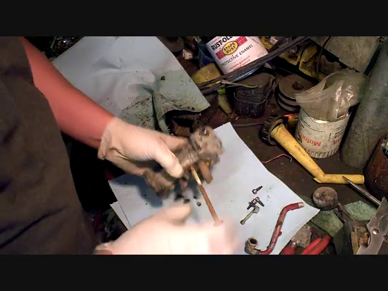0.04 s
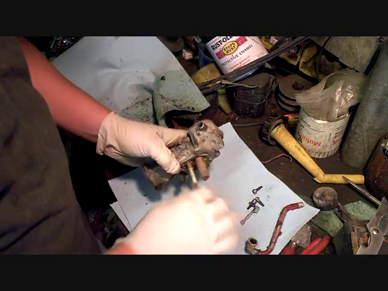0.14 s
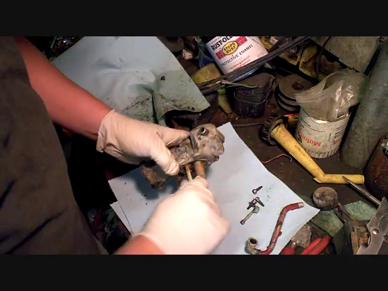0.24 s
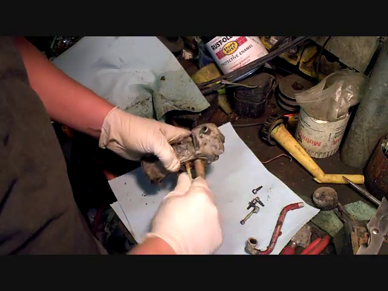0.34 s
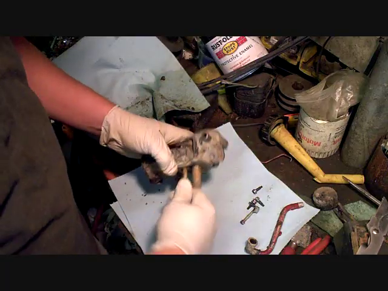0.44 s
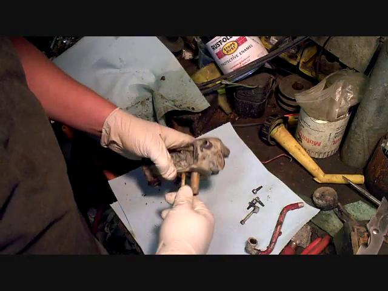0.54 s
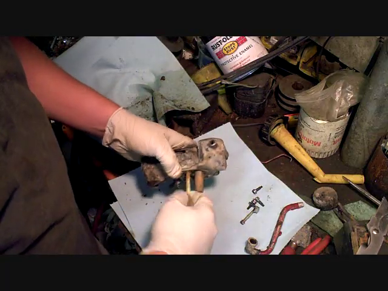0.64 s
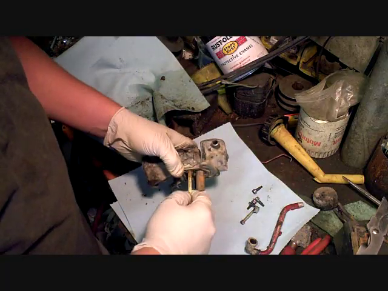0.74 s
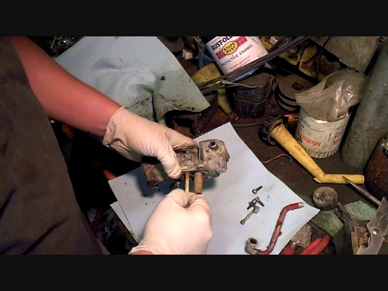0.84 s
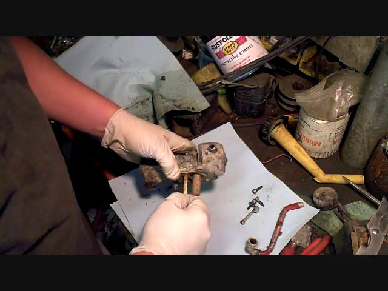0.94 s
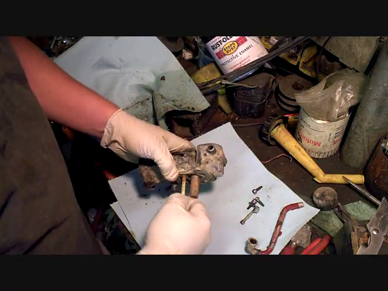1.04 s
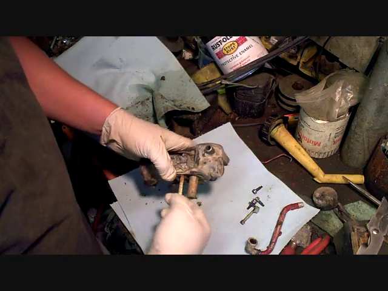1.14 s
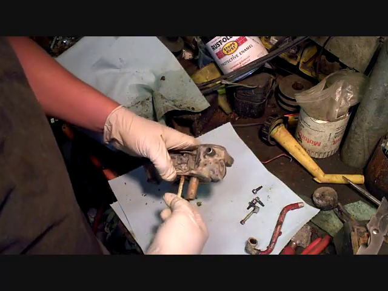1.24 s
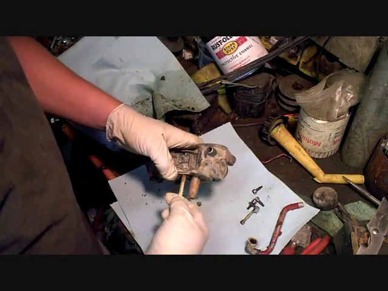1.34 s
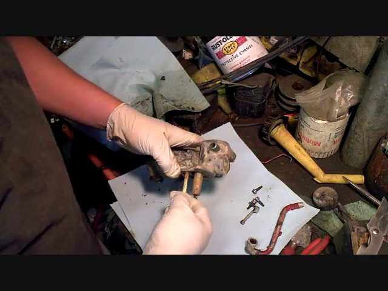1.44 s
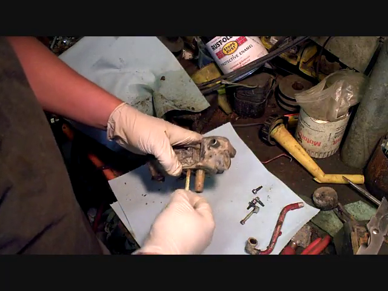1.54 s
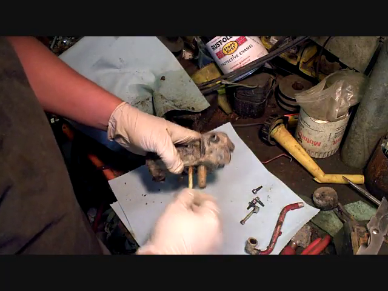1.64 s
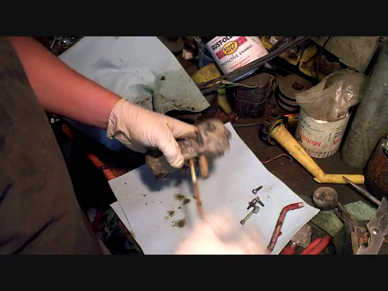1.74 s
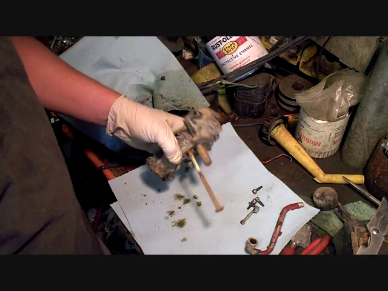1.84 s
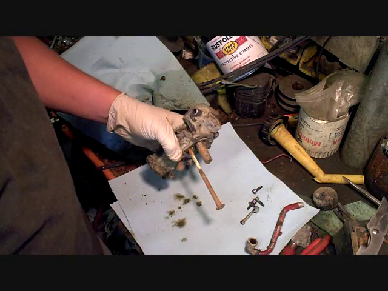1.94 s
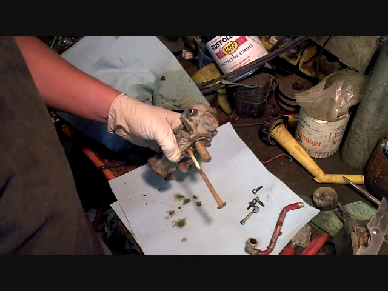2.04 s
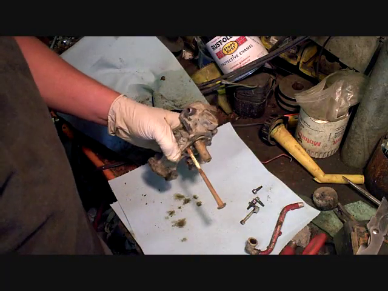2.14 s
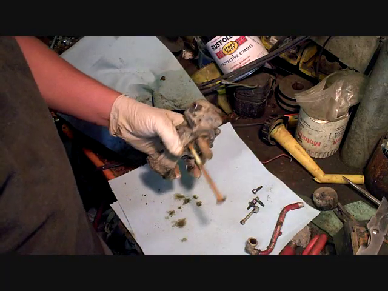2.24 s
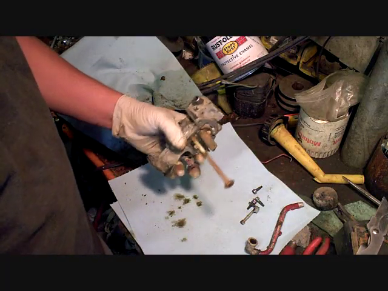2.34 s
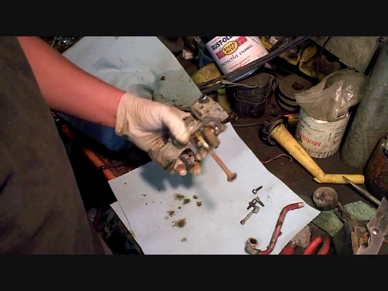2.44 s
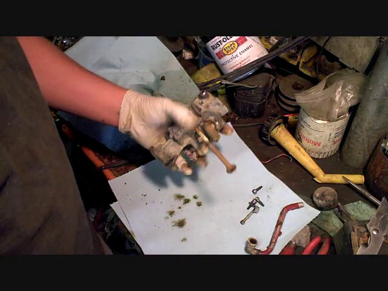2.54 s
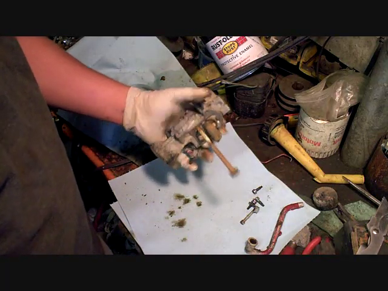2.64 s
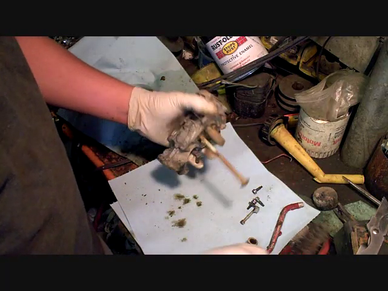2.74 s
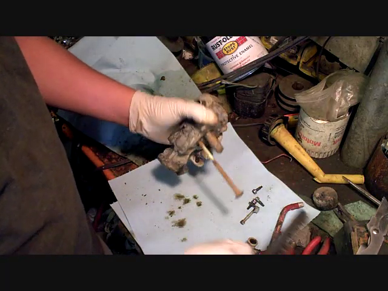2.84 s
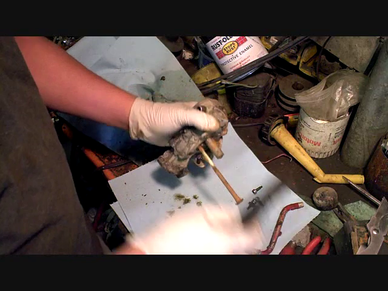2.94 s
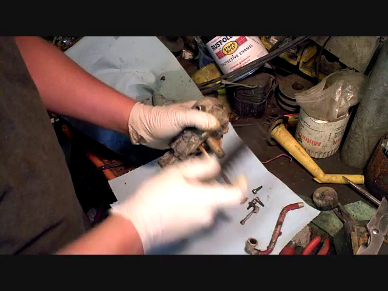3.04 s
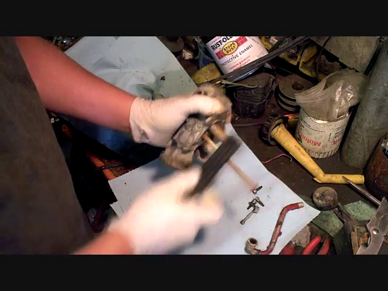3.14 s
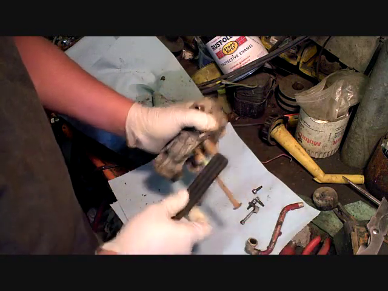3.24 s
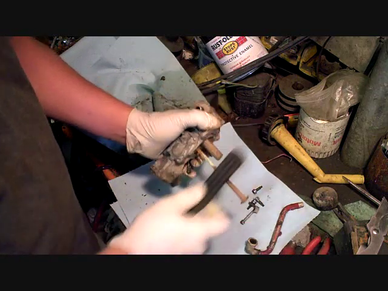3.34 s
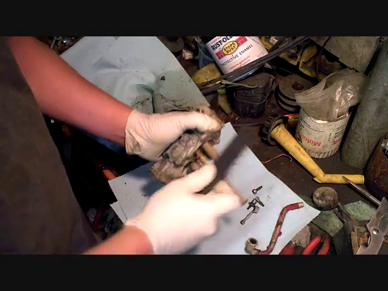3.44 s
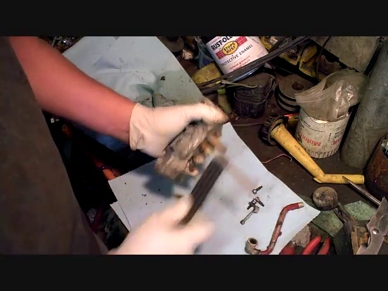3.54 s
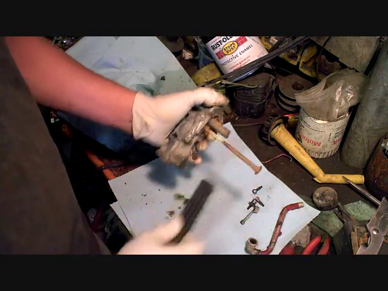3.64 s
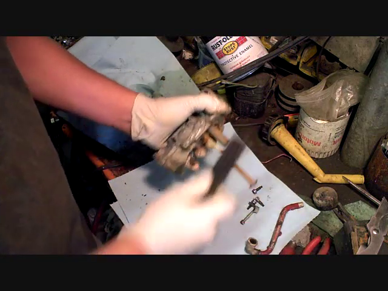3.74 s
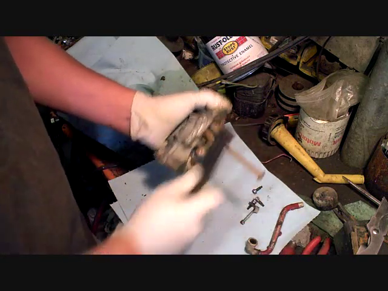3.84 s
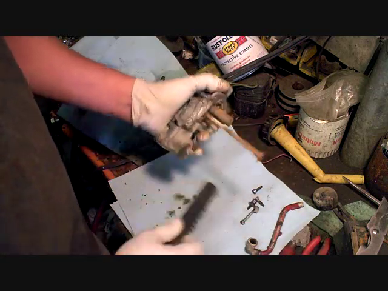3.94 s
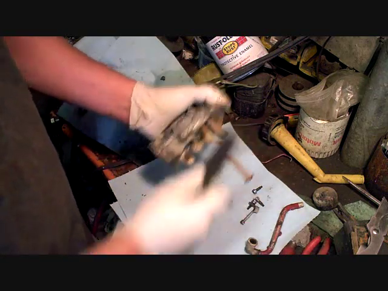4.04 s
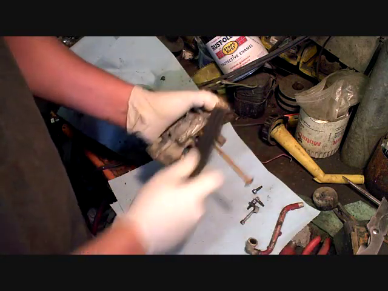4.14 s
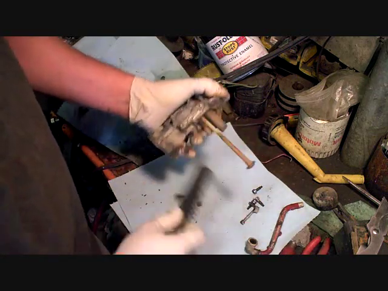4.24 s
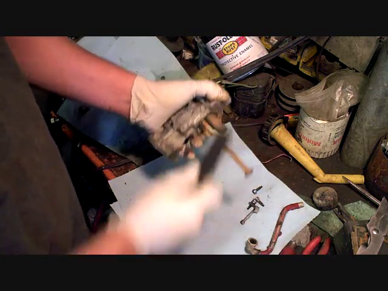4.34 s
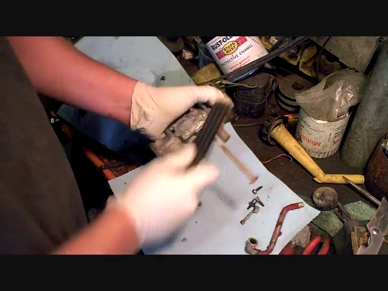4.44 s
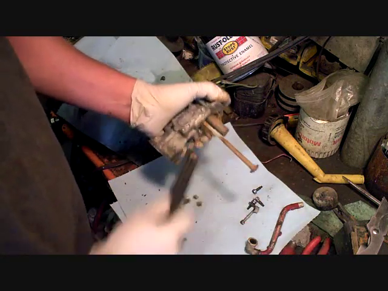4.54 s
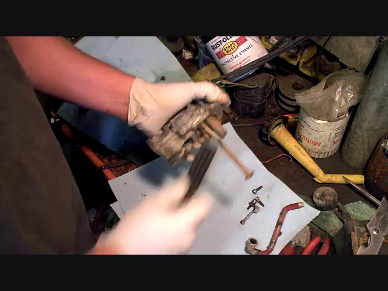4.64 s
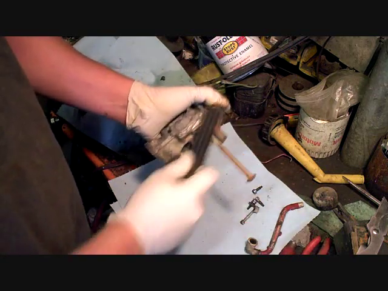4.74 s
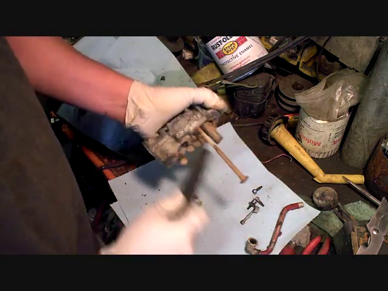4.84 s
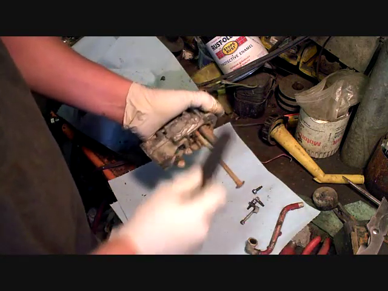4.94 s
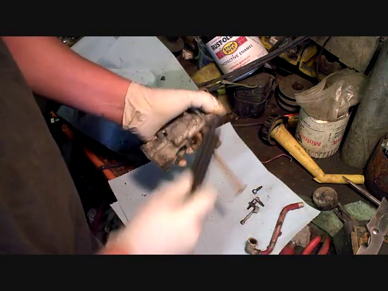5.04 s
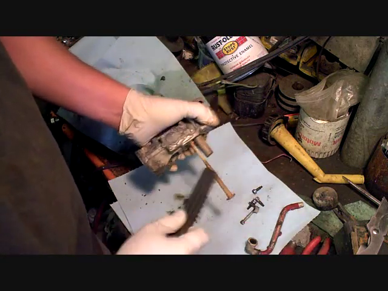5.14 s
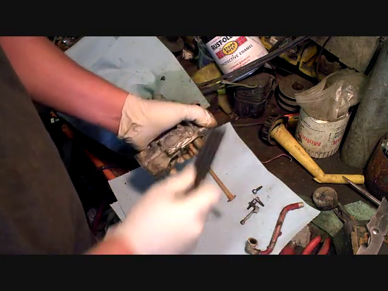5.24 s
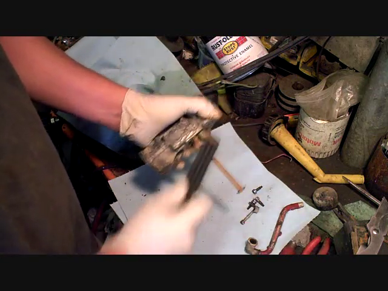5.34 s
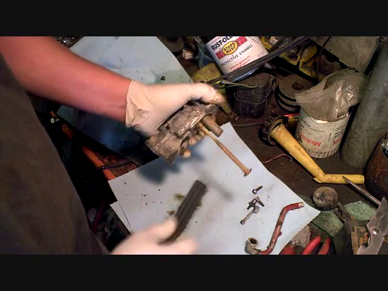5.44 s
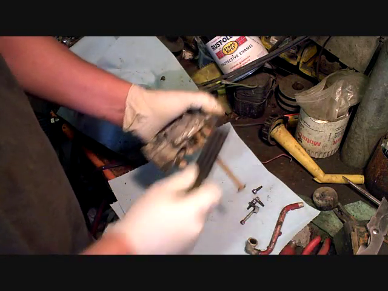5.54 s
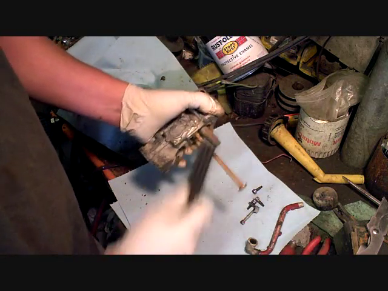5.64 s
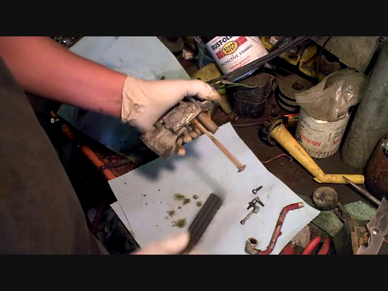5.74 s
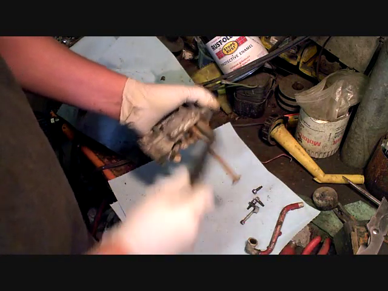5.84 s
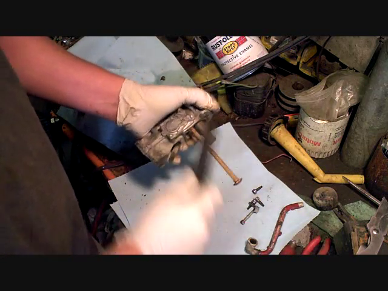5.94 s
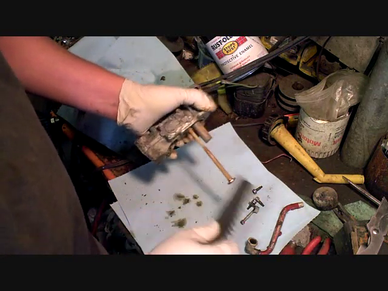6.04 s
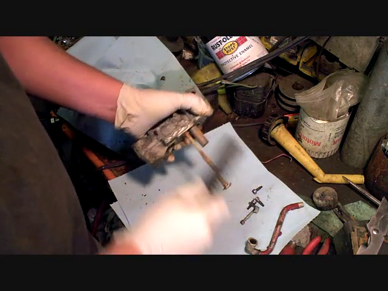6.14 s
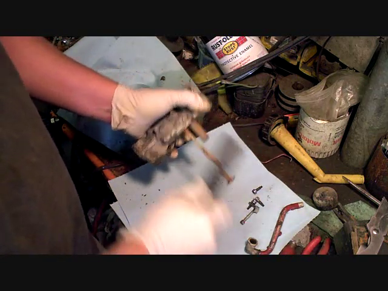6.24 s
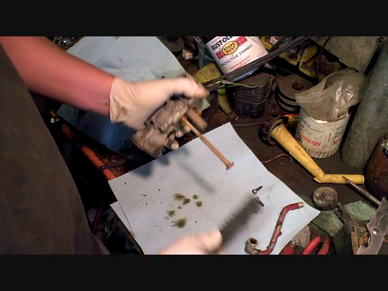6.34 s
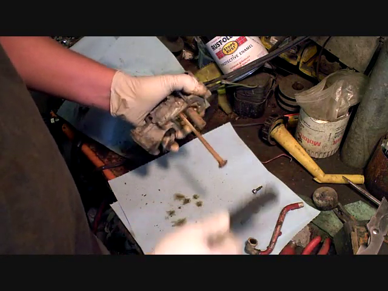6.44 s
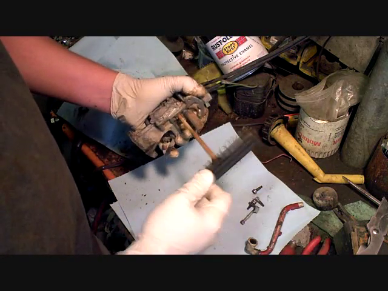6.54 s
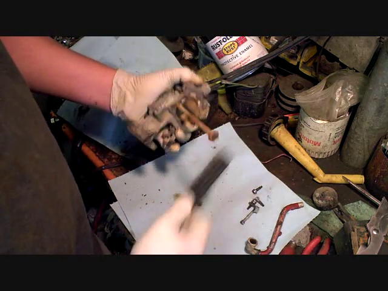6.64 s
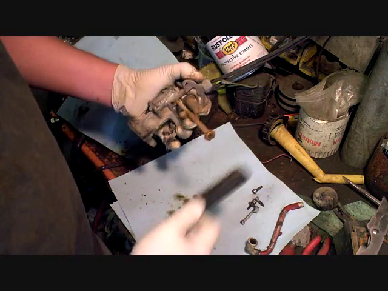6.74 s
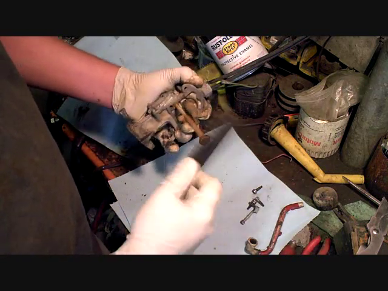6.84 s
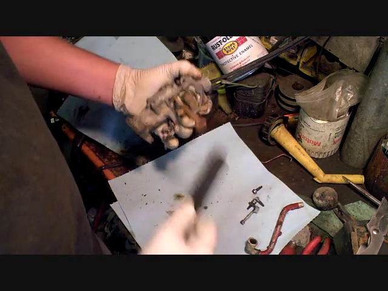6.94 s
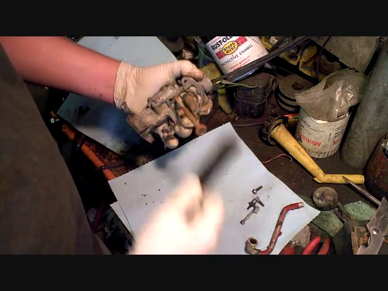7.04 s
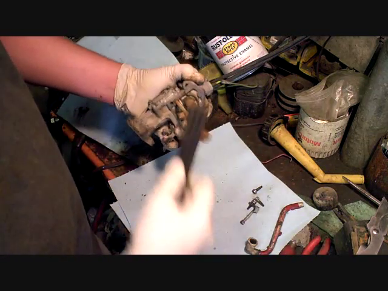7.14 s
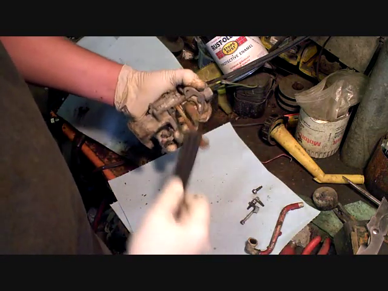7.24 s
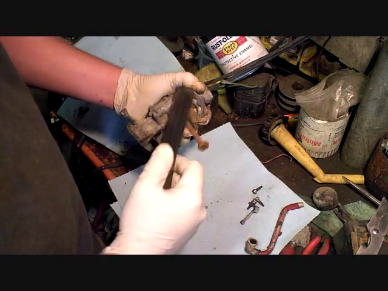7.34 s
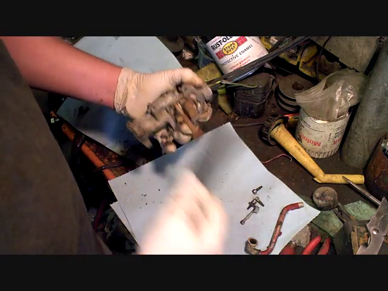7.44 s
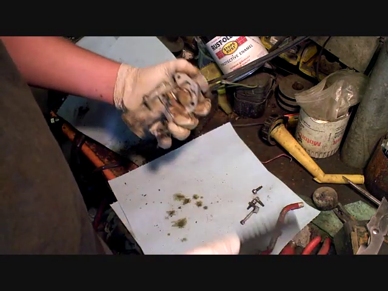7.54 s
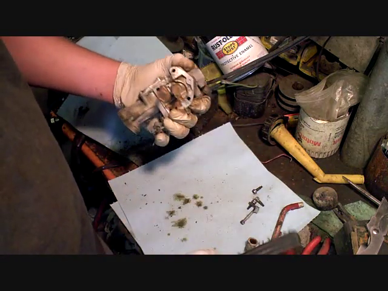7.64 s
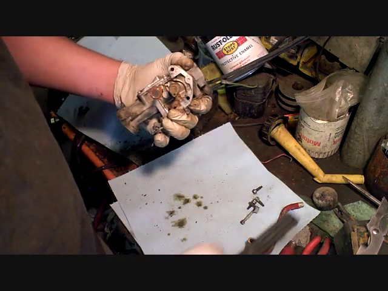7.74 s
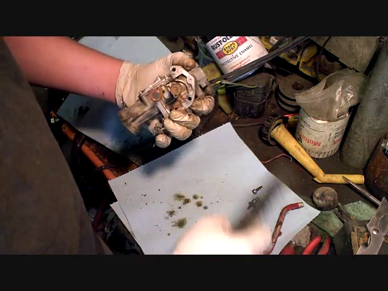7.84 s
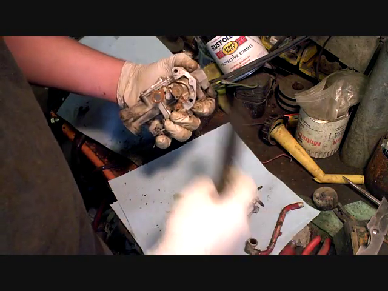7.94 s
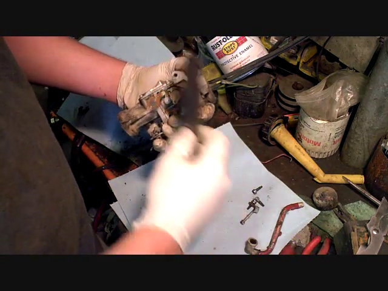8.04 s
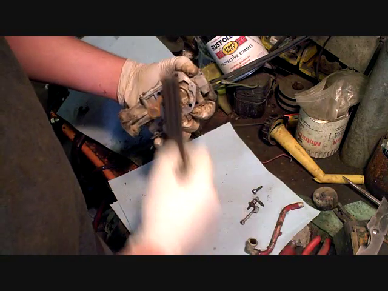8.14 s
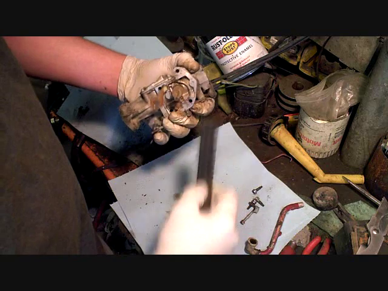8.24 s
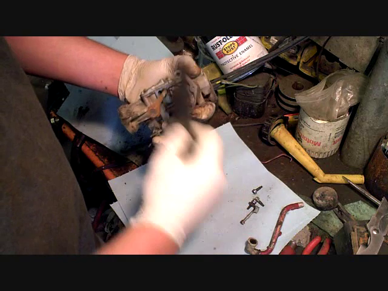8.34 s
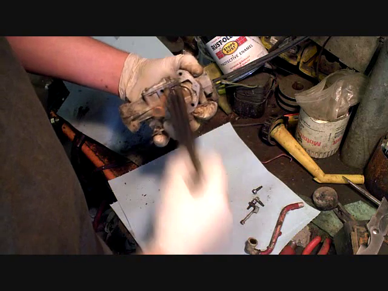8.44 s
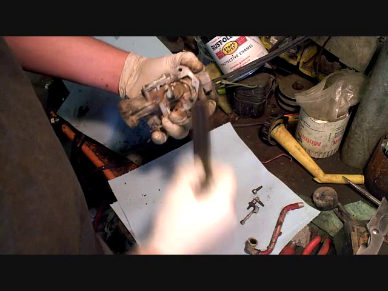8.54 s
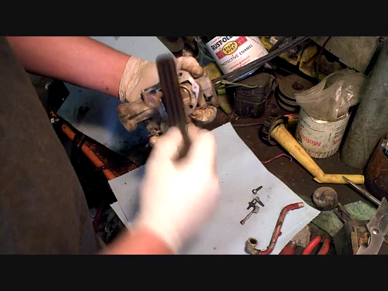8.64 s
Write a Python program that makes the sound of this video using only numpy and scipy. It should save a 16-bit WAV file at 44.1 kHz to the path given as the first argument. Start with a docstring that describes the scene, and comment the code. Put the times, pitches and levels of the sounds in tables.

```python
"""Wire brush at a workbench

A tool is dropped on the bench, bounces twice, and a wire brush is picked up with hollow taps: decaying modes.
Its bristles scrape a rusty casting, held in a gloved hand, in short quick strokes: filtered random slips and pings.
Single wires snag and flick free as short noise bursts. Gloves and a sleeve rustle faintly between the strokes,
over a steady fan-like rush of filtered noise."""
import sys
import numpy as np
from scipy import signal
from scipy.fft import rfft, irfft, next_fast_len
from scipy.io import wavfile
from scipy.ndimage import uniform_filter1d

SR = 44100
rng = np.random.default_rng(int(sys.argv[2]) if len(sys.argv) > 2 else 0)


def int16_out(signal):
    """Quantize to a 16-bit WAV file."""
    q = np.round(np.clip(np.atleast_2d(signal).T, -1, 1) * 32767)
    wavfile.write(sys.argv[1], SR, q.astype(np.int16))


N = 382788
T = np.arange(N) / SR  # time in seconds

# Brush strokes. Each row: start in seconds, length in seconds, attack in seconds, relative scrape level in dB,
# ring of the bristle tuft relative to that level in dB.
STROKES = [ (3.227, 0.041, .005, -43, 1.5), (3.265, 0.043, .006, -55, 6), (3.325, 0.071, .02, -56.5, 1),
           (3.559, 0.098, 0.011, -41.5, -0.5), (3.892, 0.094, 0.028, -42.5, 2.5),
           (4.207, 0.11, 0.011, -44, 2.5), (4.499, 0.024, 0.01, -49, -5), (4.528, 0.095, .02, -42.5, 0.5),
           (4.635, .028, .006, -59, -1), (4.831, 0.11, 0.0095, -44, 0.5), (4.95, .064, 0.011, -57, 1),
           (5.107, 0.11, 0.0065, -44, 1), (5.402, 0.08, .004, -41.5, -1),
           (5.688, 0.088, 0.0051, -42.5, 1.5), (6.012, 0.079, .016, -46, -3), (6.102, 0.029, .004, -44, 0),
           (6.335, 0.067, 0.031, -44, -5), (6.65, 0.047, .008, -53.5, -25),
           (6.955, 0.041, 0.0045, -46.5, -16), (6.993, 0.012, 0.0019, -43, -15),
           (7.215, 0.022, 0.0026, -50.5, -10), (7.24, 0.017, .003, -46.5, 9.5),
           (7.258, 0.032, .004, -50.5, -11), (7.303, 0.071, 0.017, -59.5, -6),
           (8.074, 0.053, 0.018, -56.5, -19), (8.197, 0.093, 0.0035, -45.5, -3.5),
           (8.472, 0.095, .004, -42, -2.5), ]
# Spectral outline of rubber rubbing on metal. Each row: frequency in Hz, relative level in dB.
RUBBER = [(800, -7), (2000, 7), (4200, 7.5), (6000, 3), (9000, -0.5), (12000, -15), (15500, -24)]


def brush():
    """Stick-slip friction: many wire tips slip over rust in uneven bunches, and the bent tuft resonates."""
    # Hiss of wire tips on rust. Each row: frequency in Hz, relative level in dB.
    scrape = [(200, -22.5), (550, -4.5), (1100, -12), (1800, -3.5), (3200, -6.5), (4100, 1.5), (5200, -3.5),
              (7000, -3.5), (9000, -5.5), (11000, -13), (15500, -22.5)]
    scraping, ringing = np.zeros(N), np.zeros(N)
    for start, length, attack, db, ring_db in STROKES:
        pressure, bend = stroke(length, attack)
        add(scraping, start, undb(db) * pressure)
        add(ringing, start, undb(db + ring_db) * pressure * bend)
    # single bunches and whole rows of wires catch and let go
    uneven = undb(1.6 * walk(300) + 1.0 * walk(90))
    slips = colour(grains(rate=10000, spread_db=2), scrape)
    wires = unit(colour(pings(rate=1100, spread_db=0.5, t60=0.015), scrape))
    # other wires touch from moment to moment
    hiss = wander(undb(-7.0) * slips + undb(-8.5) * wires, depth_db=2, rate=55)
    tuft = resonate(grains(rate=5000, spread_db=3.0), 2576, 320)
    tuft = unit(resonate(tuft, 2480, 690))
    return uneven * (undb(-0.5) * scraping * hiss + undb(-3.5) * ringing * tuft)


def stroke(length, attack):
    """Friction follows contact force: the tips land, bear down hardest midway and lift off as the tuft bends."""
    arch_db, release_s = 5, 0.039  # drop of pressure at both ends; settling by 60 dB after lift-off
    peak_share, build_db = 0.71, 24.5  # share of the stroke at which the tuft rings most; its rise up to there
    t = T[:SR // 3]
    along = np.clip(t / length, 0, 1)
    lift = fade(np.maximum(t - length, 0), release_s)
    pressure = np.minimum(t / attack, 1) * undb(-arch_db * (2 * along - 1) ** 2) * lift
    bend = undb(-build_db * (along / peak_share - 1) ** 2)
    return pressure, bend


def pings(rate, spread_db, t60):
    """Free vibration: single wires spring back and ring for a few milliseconds, each at its own pitch."""
    chance = rng.random((int(rate * N / SR), 4))  # columns: place, pitch, size, phase
    t = T[:SR // 80]
    hz = 2800 + 10000 * chance[:, 1:2] ** 1.3
    size = undb(-spread_db * np.log(chance[:, 2:3] * .98 + .02))
    wires = size * fade(t, t60) * np.sin(2 * np.pi * (hz * t + chance[:, 3:4]))
    where = (chance[:, :1] * N).astype(int) + np.arange(len(t))
    return unit(np.bincount(where.ravel(), wires.ravel(), minlength=N)[:N])


def chirps():
    """Common resonance: wires of like length catch on an edge and chatter briefly as narrow-band noise; the two
    low rows near 500 Hz are the casting's body humming."""
    # Singing groups of wires, and two low hums of the casting's body. Each row: middle in seconds, pitch in Hz,
    # relative level in dB, # length at half height in seconds.
    groups = [(3.243, 6750, -43, .024), (3.602, 550, -47.5, .026), (3.951, 4060, -45, 0.04),
              (4.01, 5060, -41, 0.022), (4.253, 6460, -45, 0.027), (4.254, 507, -52, .028),
              (4.607, 8300, -52, 0.021), (5.129, 6700, -44.5, 0.019), (5.746, 4830, -44, 0.047),
              (6.05, 4570, -49, .034), (6.124, 3500, -47, .022), (6.385, 3400, -48, 0.029),
              (7.251, 4250, -43, 0.0064), (8.525, 4130, -46, 0.035), (8.528, 7500, -49, .027)]
    out = np.zeros(N)
    for middle, hz, db, length in groups:
        swell = np.hanning(int(2 * length * SR))
        width = 220 + 0.058 * hz
        chatter = resonate(rng.standard_normal(len(swell)), hz, width)
        chatter = resonate(chatter, hz, width)
        add(out, middle - length, undb(db - 2.0) * swell * unit(chatter))
    return out


def snags():
    """Impulsive release: tips tick as each stroke lands, caught wires flick free, grit ticks under the fingers."""
    # Wires that snag and flick free. Each row: time in seconds, relative level in dB.
    flicks = [(3.107, -43), (3.2827, -30.5), (3.2994, -36), (3.6526, -37), (3.8265, -45), (3.9957, -17),
              (4.0024, -24), (4.0071, -20), (4.0657, -39.5), (4.3196, -38), (4.6506, -35), (4.996, -36),
              (5.026, -38), (6.143, -32), (6.2931, -37.5), (6.3988, -30), (6.639, -38), (6.9432, -39),
              (6.996, -25.5), (7.2504, -36), (7.3662, -32.5), (7.8072, -42)]
    # Ticks of grit and rubber under the fingers. Each row: time in seconds, relative level in dB.
    specks = [(0.0667, -43), (0.4276, -48.5), (0.5482, -48), (0.8779, -49), (1.2454, -58), (1.9794, -49),
              (2.0878, -43), (2.1415, -42), (2.566, -39), (2.6453, -38.5), (3.052, -39.5), (7.656, -46)]
    landing_db, soft_db_per_s = -2, 400  # landing tick over the stroke level; a slow attack softens it
    steel = [(25, -49), (200, -9.5), (1200, -8.5), (2600, -3.5), (5000, 1.5),
             (8000, -2.5), (11000, -8.5), (15500, -23)]  # (Hz, dB)
    landings = [(start + attack / 2, db + landing_db - soft_db_per_s * attack)
                for start, _, attack, db, _ in STROKES]
    wires = ticks(flicks + landings, gain_db=-12, t60=0.023, shiver_db=-25.0, shiver_t60=0.16, outline=steel)
    grit = ticks(specks, gain_db=-9.0, t60=0.023, shiver_db=-18, shiver_t60=0.065, outline=RUBBER)
    return wires + grit


def ticks(rows, gain_db, t60, shiver_db, shiver_t60, outline):
    """Double decay: each release is a sharp noise burst with a weaker, longer shiver."""
    out, t = np.zeros(N), T[:SR // 10]
    decay = fade(t, t60) + undb(shiver_db) * fade(t, shiver_t60)
    for s, db in rows:
        add(out, s, undb(db + gain_db) * rng.standard_normal(len(t)) * decay)
    return colour(out, outline)


def knocks():
    """Modal excitation: every blow rings the same wooden top and steel tool, with a varying share of treble."""
    # The dropped tool grazes, lands and bounces. Each row: time in seconds, relative level in dB,
    # further treble gain in dB.
    blows = [(2.196, -40.5, 2.5), (2.2063, -10, 2.5), (2.273, -14.5, -1), (2.3144, -22, -2)]
    # Modes of bench top and tool. Each row: frequency in Hz, relative level in dB, decay by 60 dB in seconds.
    bench_modes = [(303, -25, .12), (389, -25, 0.16), (532, -7, 0.088), (648, -5.5, .12), (680, -9.5, 0.11),
                   (858, -10, 0.13), (904, -6, 0.082), (1017, -14, .11), (1110, -14, 0.081),
                   (1284, -9.5, 0.1), (1392, -22, .12), (1550, -8, .04)]
    # Modes that sound chiefly in the tool, with the same columns.
    tool_modes = [(2040, 20, 0.035), (2160, -23, 0.17), (2790, 6, 0.08), (3010, 6, 0.063),
                  (3900, -12, 0.11), (4200, -29, 0.84), (4620, -19, 0.11), (4600, -19, 0.066),
                  (4940, 3, 0.12), (5400, 7, 0.054), (5860, -17, 0.14)]
    # Clatter of the blow. Each row: frequency in Hz, relative level in dB.
    clatter = [(25, -52), (180, -28), (300, -3.5), (430, -14), (540, -2.5), (760, -8), (900, 3),
               (1200, 0.5), (1500, -5.5), (1780, -18), (2150, -7), (2850, -5), (3400, -19.5), (4000, -15),
               (5200, -14), (6700, -27), (7800, -15.5), (9500, -31.5), (15500, -40)]
    out, t = np.zeros(N), T[:SR // 2]
    bench, tool = ring(bench_modes, t), ring(tool_modes, t)
    split = signal.butter(3, 1750, fs=SR, output="sos")
    for s, db, treble_db in blows:
        dense = colour(rng.standard_normal(len(t)), clatter)  # the many modes too close to tell apart
        low = signal.sosfiltfilt(split, dense)
        body = undb(-5.5) * low * fade(t, 0.093) + undb(-4.5) * bench
        steel_decay = undb(-1.5) * fade(t, 0.041) + undb(-22.5) * fade(t, 0.17)
        steel = (dense - low) * steel_decay + undb(-9.5) * tool
        onset = 1 - fade(t, 0.0042)
        add(out, s, undb(db) * onset * (body + undb(treble_db) * steel))
    return out


def ring(modes, t):
    """Modal superposition: decaying sines in random phase, their sum scaled to peak 1."""
    y = sum(undb(db) * fade(t, t60) * np.sin(2 * np.pi * (hz * t + rng.random())) for hz, db, t60 in modes)
    return y / np.abs(y).max()


def taps():
    """Damped oscillation: soft contacts ring for a few cycles, echo off the bench top and stir its wood."""
    # Hollow taps as the brush is picked up. Each row: time in seconds, relative level in dB, pitch in Hz,
    # time constant of the contact in seconds.
    contacts = [(2.4646, -28.5, 1760, 0.0002), (2.5669, -28.5, 1380, 0.00042),
                (2.5758, -22.5, 1450, .00055), (2.589, -33, 1530, 0.0008), (2.6174, -28.5, 1250, 0.00062),
                (2.6203, -38, 2110, 0.00023)]
    wood_outline = [(60, -26), (350, 0), (1300, 11), (2600, -5), (4000, -37), (12000, -32)]  # (Hz, dB)
    out, t = np.zeros(N), T[:SR // 10]
    for s, db, hz, push in contacts:
        swell = (t / push) ** 2 * np.exp(-t / push)
        tap = undb(db) * swell * 2.0 * np.sin(2 * np.pi * hz * t)
        wood = colour(rng.standard_normal(len(t)) * fade(t, 0.08), wood_outline)
        add(out, s, tap + undb(db - 17.5) * wood)
        add(out, s + 0.00314, 0.4 * tap)  # echo
    return out


def handling():
    """Sliding friction: rubber rubs and crackles on metal; cloth swishes with each swing of the arm."""
    # Gloves rubbing on the casting. Each row: middle in seconds, length in seconds, relative level in dB,
    # fine crackle relative to that level in dB.
    gloves_rows = [(0.104, 0.18, -65.5, -12), (0.267, 0.072, -60, -1), (0.438, 0.23, -69, -8),
                   (0.688, 0.12, -69, -2), (1.238, .22, -77.5, 5), (1.748, 0.056, -66, 1),
                   (1.865, 0.15, -67, -7), (1.992, 0.021, -62.5, -4), (2.155, 0.45, -60.5, -13),
                   (2.451, 0.18, -53, -31), (2.62, 0.068, -59.5, -6), (2.762, 0.15, -52.5, -13),
                   (2.87, 0.15, -69, -23), (3.027, 0.32, -62, -10.5), (7.694, 0.23, -69.5, -3.5)]
    # The sleeve as the arm swings. Each row: start in seconds, length in seconds, relative level in dB.
    sleeve_rows = [(4.094, .13, -54.5), (4.381, 0.11, -55), (4.6, 0.1, -61.5), (5.17, 0.026, -56),
                   (5.891, 0.2, -54.5), (6.197, 0.13, -58), (7.944, 0.26, -62.5)]
    # Outline of rustling cloth. Each row: frequency in Hz, relative level in dB.
    cloth = [(600, -35), (1800, 3.5), (2700, -2.5), (4200, -0.5), (7500, -6.5), (10000, -16), (15000, -29)]
    # Outline of the fine crackle. Each row: frequency in Hz, relative level in dB.
    crackle_outline = [(800, -25), (3000, -18), (6000, 4), (10000, 0.5), (13000, -11), (15500, -15)]
    rise_db, release_s = 2.5, 0.55  # the swish grows as the arm gathers speed, then decays at 60 dB per release_s
    rubs, peeling = np.zeros(N), np.zeros(N)
    for middle, length, db, crackle_db in gloves_rows:
        add(rubs, middle - length, undb(db) * rub(length))
        add(peeling, middle - length, undb(db + crackle_db) * rub(length))
    swings, t = np.zeros(N), T[:SR // 2]
    for start, length, db in sleeve_rows:
        speed = np.minimum(t / length, 1)
        settle = fade(np.maximum(t - length, 0), release_s)
        add(swings, start, undb(db - rise_db * (1 - speed)) * (1 - fade(t, 0.15)) * settle)
    gloves = rubs * wander(colour(grains(rate=2500, spread_db=-0.5), RUBBER), depth_db=1.5, rate=21)
    crackle = peeling * colour(grains(rate=770, spread_db=2.5), crackle_outline)
    sleeve = swings * colour(grains(rate=20000, spread_db=3.0), cloth)
    return undb(0.5) * gloves + undb(3) * crackle + undb(-1.0) * sleeve


def rub(length):
    """Gaussian envelope: one rub, 11 dB down half a length from its middle, dies away over twice its length."""
    return undb(-11 * np.linspace(-2, 2, int(2 * length * SR)) ** 2)


def workshop():
    """Broadband noise through resonances: a steady rush, slightly hollow, with a faint high whine."""
    # Outline of the rush. Each row: frequency in Hz, relative level in dB.
    rush_outline = [(25, -36), (60, -29), (105, -8.5), (150, -20.5), (250, 1.5), (400, -0.5), (620, -1),
                    (830, 2), (1100, -0.5), (1450, 1.5), (1750, -8.5), (2600, -15), (9000, -24),
                    (15500, -33)]
    # Broad resonances. Each row: frequency in Hz, width of each of two passes in Hz, relative level in dB.
    peaks = [(388, 320, -2.5), (790, 148, 0.8)]
    hollow = np.zeros(N)
    for hz, width, db in peaks:
        once = resonate(rng.standard_normal(N), hz, width)
        hollow += undb(db) * resonate(once, hz, width)
    waver = undb(.3 * walk(6))
    rush = colour(rng.standard_normal(N), rush_outline) * waver
    whine = unit(resonate(rng.standard_normal(N), 7720, 90))
    return undb(-57.5) * rush + undb(-64) * unit(hollow) + undb(-85) * whine


def room(x, early_db, early_t60, late_db, late_t60):
    """Reverberation by convolution: quick reflections from the cluttered bench, then a weak dull tail."""
    t = T[:SR // 2]

    def reflections(t60):
        """Diffuse field: decaying noise of unit energy after a 3 ms gap."""
        return unit(rng.standard_normal(len(t)) * fade(t, t60) * (t > .003)) / np.sqrt(len(t))

    early = reflections(early_t60)
    late = colour(reflections(late_t60), [(200, 4), (2500, 1), (6000, -3.5), (14000, -29)])
    return x + signal.fftconvolve(x, undb(early_db) * early + undb(late_db) * late)[:N]


def undb(db):
    """Logarithmic level: decibels to amplitude gain."""
    return 10 ** (np.asarray(db) / 20)


def unit(x):
    """Normalisation: scale to rms 1."""
    return x / np.sqrt(np.mean(x ** 2) + 1e-20)


def fade(t, t60):
    """Exponential decay by 60 dB in t60 seconds, at least 1 ms."""
    return np.exp(-np.log(1000) * t / max(t60, 1e-3))


def add(out, s, sound):
    """Linear superposition: mix a sound in at s seconds."""
    i = int(s * SR)
    out[max(i, 0):i + len(sound)] += sound[max(-i, 0):N - i]


def colour(x, points):
    """Minimum-phase filter with the given (Hz, dB) outline, at unit power gain."""
    hz, db = np.transpose(points)
    f = np.fft.rfftfreq(4096, 1 / SR)
    gain = unit(undb(np.interp(np.log(f + 1), np.log(hz), db)))
    cepstrum = irfft(np.log(gain))
    cepstrum[1:len(f) - 1] *= 2  # folding the cepstrum makes the filter causal
    cepstrum[len(f):] = 0
    return signal.fftconvolve(x, irfft(np.exp(rfft(cepstrum))))[:len(x)]


def resonate(x, hz, width):
    """Second-order resonance, gain 1 at its centre; width in Hz."""
    return signal.lfilter(*signal.iirpeak(hz, hz / width, fs=SR), x)


def walk(rate):
    """Low-frequency modulation: smooth random wavering of rms 1, with about rate new values a second."""
    k = max(int(SR / rate), 2)
    steps = rng.standard_normal(N)[np.arange(N) // k]
    return unit(uniform_filter1d(steps, k))


def grains(rate, spread_db):
    """Shot noise: random tiny slips of either sign and varied size, rate a second on average."""
    happens = rng.random(N) < rate / SR
    sign = rng.choice([-1, 1], N)
    size = undb(spread_db * np.minimum(rng.exponential(size=N), 5))
    return unit(happens * sign * size)


def wander(x, depth_db, rate):
    """Independent band modulation: third-octave bands from 1 to 16 kHz swell and fade on their own."""
    size = next_fast_len(N)
    # all below 1 kHz goes with the lowest band, all above 16 kHz with the highest
    place = 3 * np.log2(np.clip(np.fft.rfftfreq(size, 1 / SR), 1000, 16000) / 1000)
    spectrum = rfft(x, size)
    out = np.zeros(N)
    for k in range(int(place[-1]) + 1):
        band = irfft(spectrum * np.maximum(1 - np.abs(place - k), 0), size)[:N]
        out += band * undb(depth_db * walk(rate))
    return unit(out)


def scene():
    """Superposition: all the work at the bench with its reflections, over the steady rush."""
    work = brush() + chirps() + snags() + knocks() + taps() + handling()
    return (room(work, early_db=-13.5, early_t60=0.14, late_db=-26, late_t60=0.34) + workshop())[None]


def record(dry):
    """Band limitation: a steep elliptic low-pass cuts the top above 15.8 kHz."""
    return signal.sosfilt(signal.ellip(8, .2, 70, 15800, fs=SR, output="sos"), dry)


dry = scene()
out = record(dry)
int16_out(out)
```